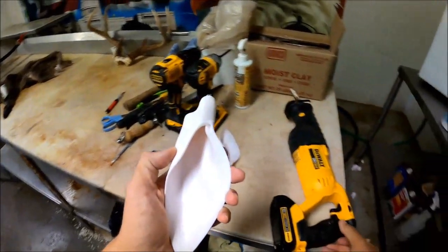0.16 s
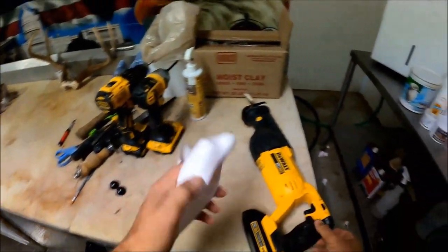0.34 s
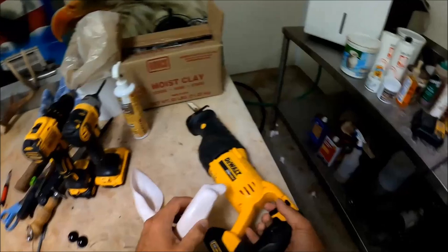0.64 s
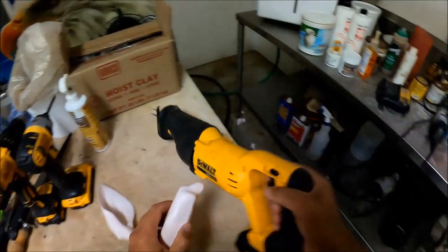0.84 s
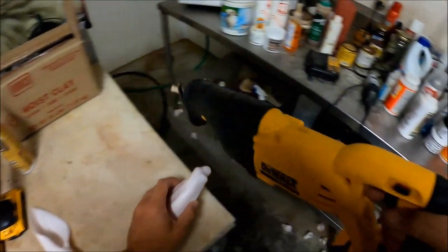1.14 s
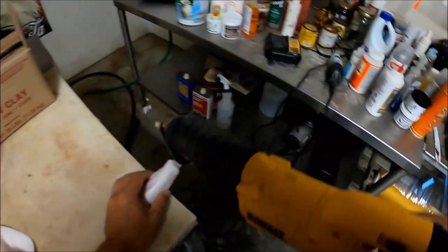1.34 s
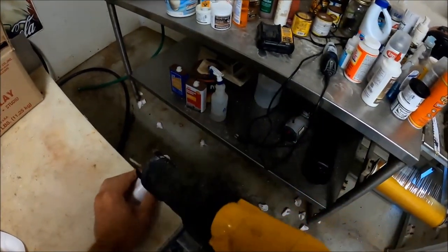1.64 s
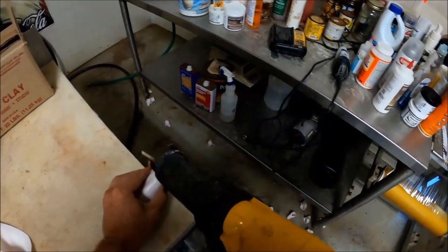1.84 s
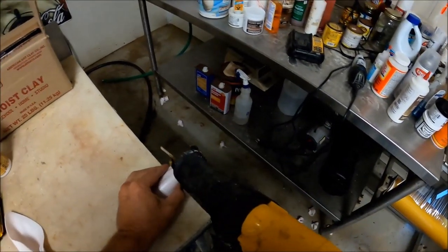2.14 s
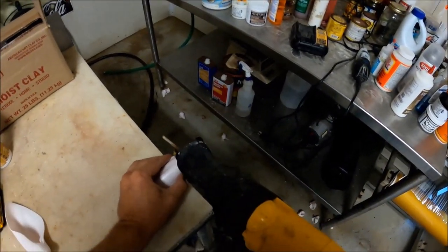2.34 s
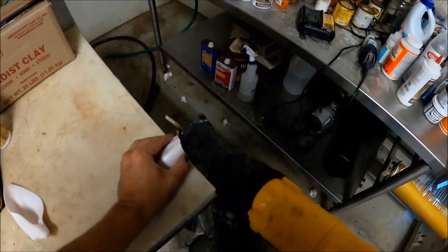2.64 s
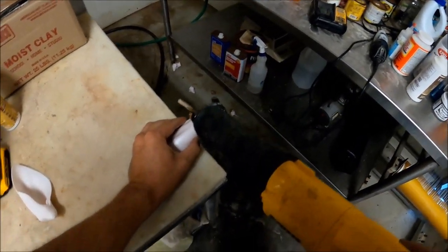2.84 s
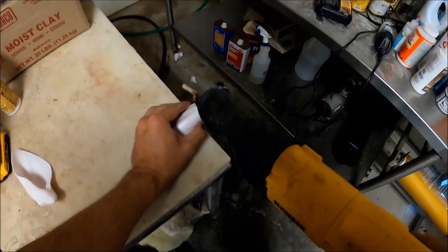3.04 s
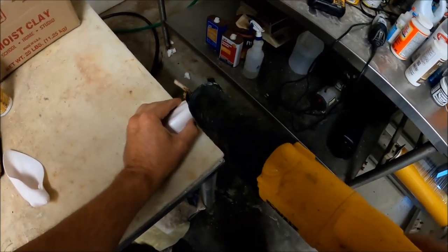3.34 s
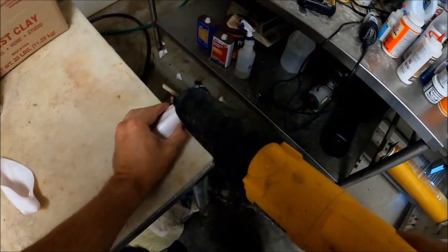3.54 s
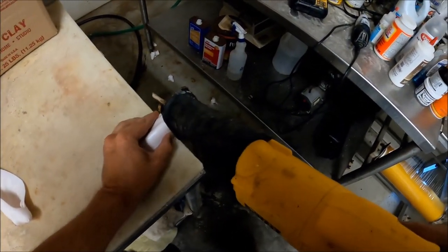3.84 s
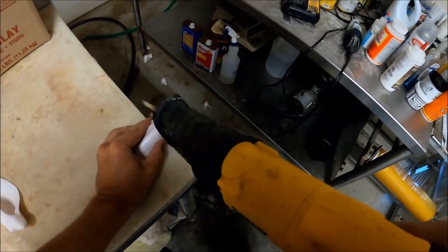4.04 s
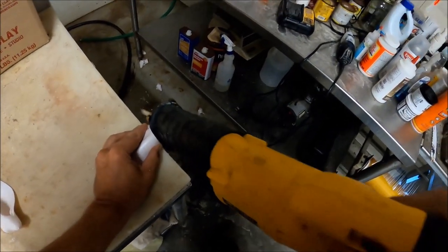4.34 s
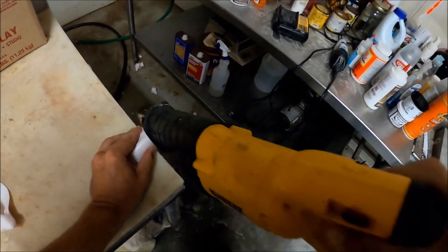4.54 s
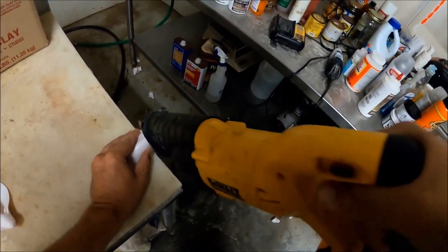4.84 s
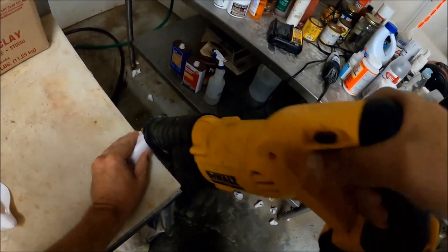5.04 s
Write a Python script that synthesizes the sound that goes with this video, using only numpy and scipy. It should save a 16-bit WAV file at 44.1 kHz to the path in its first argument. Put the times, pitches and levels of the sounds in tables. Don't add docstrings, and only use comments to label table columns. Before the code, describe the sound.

Handling bumps and taps of a cordless reciprocating saw in a hard-walled workshop, a pause, then a sharp click and harsh steady cutting clatter.

```python
import sys
import numpy as np
from scipy import signal
from scipy.fft import rfft, irfft
from scipy.io import wavfile
from scipy.ndimage import uniform_filter1d

SR = 44100
rng = np.random.default_rng(int(sys.argv[2]) if len(sys.argv) > 2 else 0)


def decibels_to_gain(level_db):
    exponent = np.asarray(level_db, float) / 20
    return 10 ** exponent


def waveform_to_disk(signal):
    frames = np.transpose(np.atleast_2d(signal))
    scaled = np.clip(frames, -1, 1) * 32767
    samples = np.round(scaled).astype(np.int16)
    wavfile.write(sys.argv[1], SR, samples)


N = 228658
T = np.arange(N) / SR
SAW_START_S = 4.1
FAN_FROM_HZ = 6900


def level(x, db):
    return x * decibels_to_gain(db) / np.sqrt(np.mean(x ** 2))


def along(points, size):
    hz, value = np.transpose(points)
    bins_hz = np.arange(size // 2 + 1) * SR / size
    return np.interp(np.log(bins_hz + 1), np.log(hz), value)


def colour(x, points):
    cepstrum = irfft(along(points, size=2048) * np.log(10) / 20)
    cepstrum[1:1024] *= 2
    cepstrum[1025:] = 0
    response = irfft(np.exp(rfft(cepstrum)))
    return signal.fftconvolve(x, response)[:len(x)]


def ring(x, hz, width_hz):
    return signal.lfilter(*signal.iirpeak(hz, hz / width_hz, SR), x)


def body(x, modes):
    return sum((-1) ** k * decibels_to_gain(db) * ring(x, hz, width) for k, (hz, width, db) in enumerate(modes))


def walk(rate):
    hold = int(SR / rate)
    steps = np.repeat(rng.standard_normal(N // hold + 1), hold)
    return uniform_filter1d(uniform_filter1d(steps, hold), hold)[:N]


def grit(scatter_db, shape):
    return rng.standard_normal(shape) * decibels_to_gain(scatter_db * rng.exponential(size=shape))


# (time [s], stroke rate [Hz], clatter level [dB])
SAW_SPEED = [
    (4.1, 34.52, -24.5),
    (4.114, 35.7, -25.5),
    (4.204, 40.1, -29),
    (4.352, 41.24, -28),
    (4.53, 39.9, -28.5),
    (4.712, 38.7, -29),
    (4.802, 39.9, -28),
    (4.9, 40.9, -29),
    (5.18, 42, -29),
]


def saw():
    time_s, rate_hz, clatter_db = np.transpose(SAW_SPEED)
    hz = np.interp(T, time_s, rate_hz)
    turns = np.cumsum(hz * (T > SAW_START_S)) / SR
    on = np.clip((T - 4.09) / 0.02, 0, 1)
    kick = np.exp(-((T - 4.13) / 0.024) ** 2) * np.sin(2 * np.pi * 168 * T)
    clatter = gear_clatter(turns, on) * decibels_to_gain(np.interp(T, time_s, clatter_db))
    return clatter + on * stroke_tones(hz, turns) + decibels_to_gain(-33) * kick


# (frequency [Hz], density [dB per Hz])
CLATTER_COLOUR = [(35, -55), (60, -9.5), (142, -18), (201, -8.5), (265, -16.5), (319, -6.5), (1020, -10),
                  (1260, -3.5), (2710, -14.5), (3830, -9), (5070, -10), (6850, -22.5), (12200, -34.5),
                  (14400, -40), (15400, -48)]


def gear_clatter(turns, on):
    stroke, share = turns.astype(int), turns % 1
    contacts = on * gear_contacts(stroke, share)
    dull, sharp = blow_envelopes(stroke, share)
    low = signal.butter(3, 2800, fs=SR, output="sos")
    high = signal.butter(3, 2800, "high", fs=SR, output="sos")
    hiss_band = signal.butter(2, 4400, "high", fs=SR, output="sos")

    direct = level(colour(contacts * dull, CLATTER_COLOUR), -7.5)
    clatter = signal.sosfilt(low, direct + level(housing(contacts * dull), -15.5))
    direct = level(colour(contacts * sharp, CLATTER_COLOUR), -7)
    rattle = signal.sosfilt(high, direct + level(housing(contacts * sharp), -16))
    hiss = signal.sosfiltfilt(hiss_band, rattle)
    rattle_db = 0.5 + 0.5 * (T - SAW_START_S)
    return clatter + (rattle - hiss) * decibels_to_gain(rattle_db) + hiss * decibels_to_gain(-1)


def gear_contacts(stroke, share):
    contacts = signal.lfilter([1], [1, -0.45], grit(1.1, (60, 1200)), axis=0)
    running = contacts[stroke, (share * 1200).astype(int)]
    return np.where(T > SAW_START_S, running, rng.standard_normal(N))


# (share of stroke [0-1], dull level [dB], sharp level [dB])
STROKE_BLOWS = [
    (.03, -4.5, -1),
    (0.269, -30.5, -6),
    (0.361, -7, -10),
    (0.518, -3.5, -4.5),
    (0.689, -7, -30),
    (0.781, -11.5, -8.5),
]


def blow_envelopes(stroke, share):
    dull, sharp = np.full(N, 0.6), np.full(N, 0.22)
    for at, dull_db, sharp_db in STROKE_BLOWS:
        timing, force = rng.standard_normal((60, 2))[stroke].T
        since = (share - at - 0.013 * timing) % 1
        dull = dull + decibels_to_gain(dull_db + 3 * force) * np.exp(-since / 0.08)
        sharp = sharp + decibels_to_gain(sharp_db + 2.5 * force) * np.exp(-since / 0.03)
    return dull, sharp


# (frequency [Hz], width [Hz], level [dB])
HOUSING_MODES = [(930, 68, 4.5), (1110, 54, -24), (1165, 130, 0), (1304, 120, -3), (1511, 77, 6),
                 (1740, 87, -8), (1886, 160, -7), (2420, 31, 1), (3530, 160, -5), (3830, 51, 0.5),
                 (4720, 210, -9), (4500, 54, -35)]


def housing(x):
    return sum(decibels_to_gain(db + 3.4 * walk(12)) * ring(x, hz, width) for hz, width, db in HOUSING_MODES)


# (multiple [of stroke rate], level [dB])
STROKE_HARMONICS = [(1, 0.5), (2, 1.5), (3, 0.5), (4, -1.5), (6, 1), (7, -3), (8, -8)]


def stroke_tones(hz, turns):
    shake = 0
    for multiple, db in STROKE_HARMONICS:
        cycles = multiple * turns + rng.random() + 0.05 * walk(30)
        shake = shake + decibels_to_gain(db + 2.2 * walk(16)) * np.sin(2 * np.pi * cycles)
    since_jolt = T - 4.21
    shake_db = -41.5 + np.where(since_jolt < 0, 20 * since_jolt / 0.05, -19.5 * since_jolt)

    bench_mode_hz, bench_width_hz = 203.9, 4.4
    detuning = (5 * hz - bench_mode_hz) / bench_width_hz
    fifth_db = -39 - 20 * np.log10(1 + detuning ** 4)
    return shake * decibels_to_gain(shake_db) + np.sin(2 * np.pi * 5 * turns) * decibels_to_gain(fifth_db)


# (frequency [Hz], density [dB per Hz])
FAN_COLOUR = [(6000, 1.5), (8500, -8), (12500, -10.5), (13800, -17), (15000, -29)]


def fan():
    high = signal.butter(4, FAN_FROM_HZ, "high", fs=SR, output="sos")
    shared, left, right = [signal.sosfilt(high, colour(grit(1.5, N), FAN_COLOUR)) for _ in range(3)]
    hiss = np.array([left, right]) + 0.28 * shared
    return level(hiss, -46.5) * np.clip((T - 4.09) / 0.039, 0, 1)


# (time [s], peak level [dB], ring [Hz])
LIFT_OFF = [
    (0.719, -29.5, 1340),
]
# (time [s], peak level [dB], ring [Hz], thud minus peak [dB])
BENCH_BUMPS = [(0.661, -46.5, 1310, 4), (0.742, -38.5, 802, 18.5), (0.778, -25, 897, 13.5),
               (0.793, -24, 950, 8), (0.814, -28.5, 1880, 11), (0.853, -35.5, 1360, 9.5),
               (0.9, -26.5, 1360, 7), (0.948, -43.5, 895, 14), (1.839, -35, 1490, -5),
               (2.629, -62.5, 2300, 14), (2.669, -61, 1200, -1), (3.403, -62, 1560, 13.5),
               (3.689, -55.5, 1270, 7), (3.783, -44.5, 606, 4)]
# (time [s], peak level [dB], ring [Hz], T60 [s])
SHELL_TAPS = [(0.286, -46.5, 1440, 0.018), (0.354, -47, 2260, 0.03), (0.698, -39, 1400, 0.012),
              (0.999, -36.5, 1255, 0.091), (1.036, -43, 1350, 0.024), (1.404, -27, 1250, 0.025),
              (1.408, -19, 1170, 0.058), (1.803, -25.5, 1480, 0.059), (1.851, -32.5, 1280, 0.033),
              (1.998, -36, 1250, 0.043), (2.194, -52.5, 1494, 0.037), (2.212, -54.5, 1520, .03),
              (2.814, -55, 1370, 0.015), (2.836, -61, 1650, 0.042), (2.924, -61.5, 1630, 0.03),
              (3.306, -52, 1270, 0.028), (3.766, -42, 1320, 0.053), (4.008, -35.5, 1330, 0.038)]
# (time [s], peak level [dB], ring [Hz], crack minus peak [dB])
SHARP_CLICKS = [(.681, -52.5, 4770, 2.5), (.813, -35, 2800, -5), (.822, -38, 2000, -3.5),
                (0.876, -28, 2800, -2.5), (1.232, -43.5, 1270, -9.5), (1.593, -41.5, 1380, -11),
                (1.784, -28, 1024, -11.5), (1.809, -19.5, 1595, -15), (3.22, -62.5, 1360, 7),
                (3.402, -62.5, 1560, -10), (3.634, -54.5, 1850, -9.5), (3.715, -56.5, 1490, -18),
                (3.741, -52.5, 1570, -8), (3.782, -35.5, 1425, -9), (4.024, -42, 2170, -11),
                (4.036, -42, 1110, -8), (4.076, -16, 1490, -11.5), (4.112, -38, 1350, -4),
                (4.165, -31, 1370, 3)]


def blows():
    lifts = [(*row, 19.5, 0.5, 0.051) for row in LIFT_OFF]
    bumps = [(s, db, hz, thud_db, -26, 0.044) for s, db, hz, thud_db in BENCH_BUMPS]
    taps = [(s, db, hz, -16, -26.5, t60) for s, db, hz, t60 in SHELL_TAPS]
    clicks = [(s, db, hz, -23, crack_db, 0.039) for s, db, hz, crack_db in SHARP_CLICKS]
    return lifts + bumps + taps + clicks


# (frequency [Hz], width [Hz], level [dB])
BENCH_MODES = [(64.5, 14.5, -11), (109.3, 18.5, -6), (182.6, 33, -0.5), (241, 44, -1), (460, 330, -7.5)]
# (frequency [Hz], density [dB per Hz])
CRACK_COLOUR = [(1470, 2.5), (2500, 0.5), (3440, 1), (4010, 7), (5960, -3), (6380, -1.5), (10200, -13),
                (11100, -46), (14000, -41), (15400, -60)]


def knocks():
    thud, shell, crack = np.zeros((3, N + 8192))
    t = np.arange(8192) / SR
    push = np.exp(-((t - 0.001) / 0.00065) ** 2)
    for s, db, hz, thud_db, crack_db, t60 in blows():
        noise = rng.standard_normal((3, len(t)))
        at = slice(int(s * SR), int(s * SR) + len(t))
        fade = np.clip(t / 0.00014, 0, 1) * np.exp(-np.log(1000) * t / max(t60, 0.005))
        struck = noise[0] * fade
        rung = ring(ring(struck, hz, 700), hz, 450)
        rung = rung + 0.35 * ring(ring(struck, 1.4 * hz, 1200), 1.4 * hz, 1000)
        shell[at] += decibels_to_gain(db) * rung / np.abs(rung).max()
        crack[at] += decibels_to_gain(db + crack_db) * noise[1] * fade ** 1.5
        thud[at] += decibels_to_gain(db + thud_db) * (push * np.sign(noise[2, 0]) + 0.7 * noise[2] * fade ** 0.31)
    cracks = decibels_to_gain(7.5) * colour(crack, CRACK_COLOUR)
    thuds = decibels_to_gain(8) * body(thud, BENCH_MODES)
    return (shell + cracks + thuds)[:N]


# (time [s], level [dB], ring [Hz])
PIN_PINGS = [
    (0.728, -41, 5700),
    (0.9093, -41, 5600),
    (0.924, -44, 5740),
    (0.96, -49, 5750),
    (1.009, -46.5, 5700),
    (2.0193, -53.5, 5800),
]


def loose_pin():
    pings = 0
    for s, db, hz in PIN_PINGS:
        decay = (T > s) * np.exp(-np.abs(T - s) / 0.018)
        pings = pings + decibels_to_gain(db) * decay * np.sin(2 * np.pi * hz * T)
    return decibels_to_gain(-8.5) * pings


def swell(s, db, rise_s, fall_s):
    before = (s - T) / max(rise_s, 0.005)
    after = (T - s) / max(fall_s, 0.005)
    return decibels_to_gain(db - 20 * np.where(T < s, before, after))


# (frequency [Hz], density [dB per Hz])
RUB_COLOUR = [(290, -33), (500, -19), (909, -6), (1650, 2.5), (1770, 3.5), (2610, -4), (4350, -11.5),
              (5460, -22.5), (11800, -39), (15000, -68)]
# (loudest time [s], level [dB], 20 dB rise [s], 20 dB fall [s], hiss minus rub [dB])
HAND_RUBS = [(.22, -56.5, 0.2, 0.9, 0), (.365, -45.5, 0.01, 0, -2), (.404, -38.5, 0.07, 0.19, -2),
             (.69, -48, 0.06, .03, 7.5), (.86, -39.5, .05, 0.19, 7.5), (1.14, -62.5, .2, 0.5, 7),
             (1.372, -48.5, -0.04, 0.1, 4), (1.5, -52.5, 0.17, 0.18, -12), (1.596, -55.5, 0.13, 0.16, 2),
             (1.87, -57, 0.07, 0.32, 17.5), (2.01, -67, -0.23, 0.26, 0), (2.55, -66, 0.15, 0.65, -13),
             (2.7, -60.5, 0.01, -0.1, -11), (2.878, -67, .2, 0.1, -13), (3.13, -66.5, 0.4, 0.2, -8),
             (3.23, -65, .1, 0.16, 3), (3.6, -64.5, .3, 0.8, -10), (3.762, -61, 0.06, -0.3, 7),
             (3.92, -71, 0.35, 0, -1.5), (4.012, -60, -0.1, .12, 11)]
# (loudest time [s], level [dB], 20 dB rise [s], 20 dB fall [s])
BENCH_DRAGS = [(.4, -44, 0.26, 0), (.69, -43.5, 0.44, 0.07), (.76, -31.5, 0.05, 0.01),
               (.87, -22.5, .1, 0.0977), (1.2, -50.5, 0.36, -0.04), (1.45, -35.5, 0.13, 0.15),
               (1.869, -42, .13, 0.43), (2.36, -51, 0.3, 0.3), (2.878, -56, 0.2, 0.1),
               (3.23, -58.5, 0.55, 0.3), (3.398, -58, 0.2, 0.3), (3.65, -57, 0.07, 0),
               (3.782, -38, 0.01, -0.21), (4.013, -38.5, 0.05, -0.04), (4.072, -32.5, 0.0238, -0.1)]


def slide():
    rub = level(colour(grit(2.5, N), RUB_COLOUR), 0) * decibels_to_gain(1.8 * walk(70))
    hiss = level(colour(grit(2.5, N), CRACK_COLOUR), 0) * decibels_to_gain(3 * walk(70))
    rumble = level(body(rng.standard_normal(N), BENCH_MODES), 0)
    rubbing = 0
    for s, db, rise_s, fall_s, hiss_db in HAND_RUBS:
        rubbing = rubbing + swell(s, db, rise_s, fall_s) * (rub + decibels_to_gain(hiss_db - 5.5) * hiss)
    dragging = rumble * sum(swell(*drag) for drag in BENCH_DRAGS)
    return decibels_to_gain(-11) * rubbing + decibels_to_gain(-15) * dragging


# (frequency [Hz], density [dB per Hz])
WALL_COLOUR = [(60, -11), (300, 6.5), (1200, 3), (4000, 1.5), (9000, 0.5), (15000, -37)]


def workshop(x):
    t60_s = 0.52
    t = T[:SR]
    decay = np.exp(-np.log(1000) * t / t60_s) * np.clip(t / 0.008, 0, 1)
    shared, difference = rng.standard_normal((2, SR)) * decay
    high = signal.butter(1, 900, "high", fs=SR, output="sos")
    difference = 0.67 * signal.sosfilt(high, difference)
    tail = np.array([shared + difference, shared - difference])
    tail = tail / np.sqrt(np.sum(tail ** 2))
    return decibels_to_gain(-7) * signal.fftconvolve(colour(x, WALL_COLOUR)[None], tail, axes=1)[:, :N]


# (frequency [Hz], density [dB per Hz])
AIR_COLOUR = [(12, -30), (20, -4.5), (108, -10.5), (223, -1.5), (357, -0.5), (421, -9), (470, -12.5),
              (674, -31), (914, -16.5), (1310, -19.5), (1640, -10), (1780, -24.5), (2850, -36.5),
              (7100, -22.5), (15000, -58)]
# (frequency [Hz], width [Hz], level [dB])
COMPRESSOR_HUM = [(222.6, 8.4, -76), (479.6, 2, -80.5)]


def air():
    hum = 0
    for hz, width_hz, db in COMPRESSOR_HUM:
        hum = hum + level(ring(rng.standard_normal(N), hz, width_hz), db) * decibels_to_gain(1.4 * walk(2.6))
    floor = level(colour(rng.standard_normal(N), AIR_COLOUR), -72.7)
    return floor * decibels_to_gain(4.1 * walk(2.51) + 0.58 * walk(45)) + hum


# (frequency [Hz], side minus mid [dB])
PORT_DIFFERENCE_DB = [(100, -16), (500, -12), (1200, -12.5), (2500, -8.5), (5000, -6.5), (9000, -4),
                      (14000, 2)]


def spread(x):
    echoes = rng.standard_normal((5, 1024)) * np.exp(-np.arange(1024) / 130)
    weights = np.array([walk(30) for _ in echoes])
    echo_power = np.mean(np.sum(echoes ** 2, axis=1))
    weights = weights / np.sqrt(np.sum(weights ** 2, axis=0) * echo_power)
    scattered = signal.fftconvolve(x[None], echoes, axes=1)[:, :N]
    side = colour(np.sum(weights * scattered, axis=0), PORT_DIFFERENCE_DB)
    return np.array([x + side, x - side])


def scene():
    near = knocks() + loose_pin() + slide()
    below_fan = signal.butter(2, 1.18 * FAN_FROM_HZ, fs=SR, output="sos")
    tool = signal.sosfilt(below_fan, saw())
    left, right = spread(near + tool + air()) + workshop(near + decibels_to_gain(-6.5) * tool) + fan()
    late_left = np.pad(left, (2, 0))[:N]
    return np.array([late_left * decibels_to_gain(0.56), right])


def band_limit(x):
    return signal.sosfilt(signal.butter(12, 15600, fs=SR, output="sos"), x)


def record(dry):
    top = signal.butter(14, 14700, fs=SR, output="sos")
    mix = signal.sosfilt(top, np.tanh(2.423 * dry) / 2)
    return band_limit(mix)


dry = scene()
out = record(dry)
waveform_to_disk(out)
```